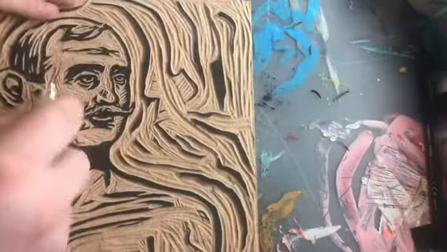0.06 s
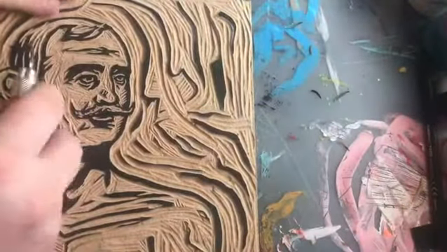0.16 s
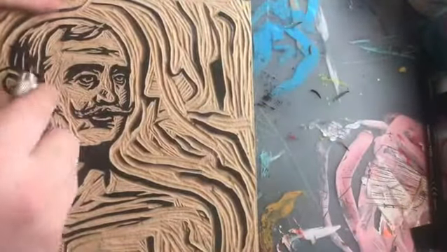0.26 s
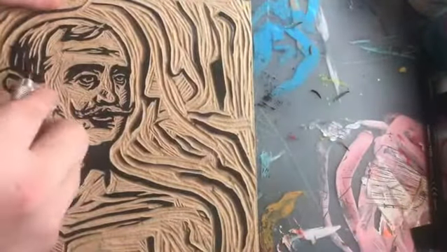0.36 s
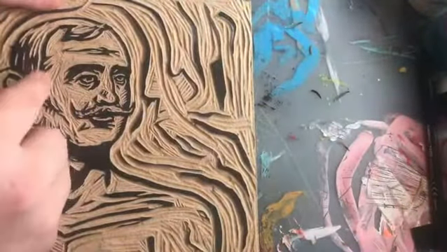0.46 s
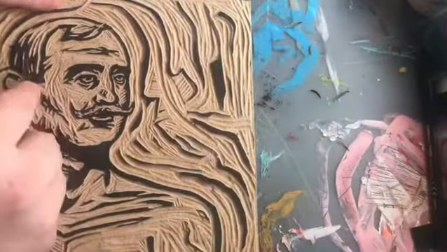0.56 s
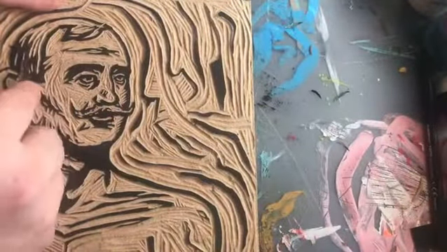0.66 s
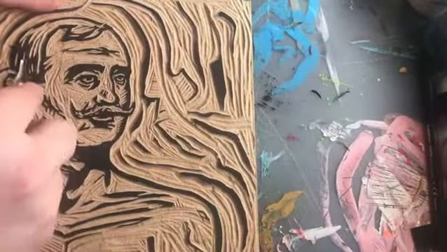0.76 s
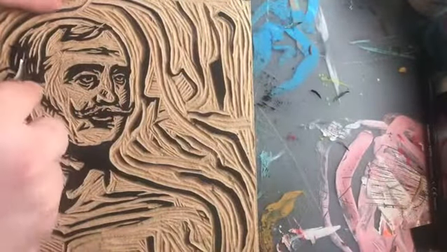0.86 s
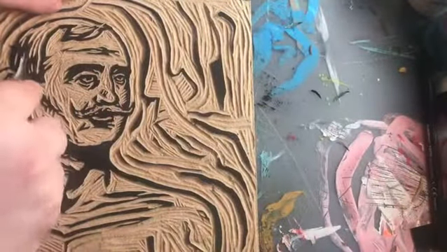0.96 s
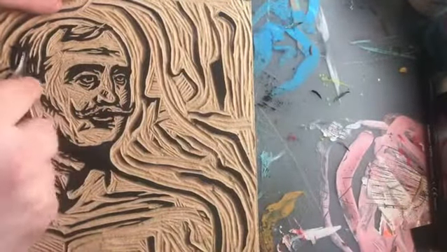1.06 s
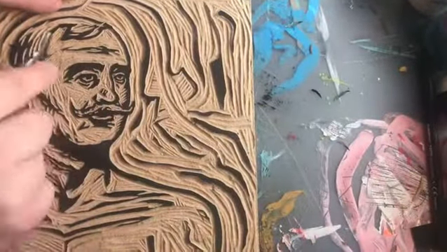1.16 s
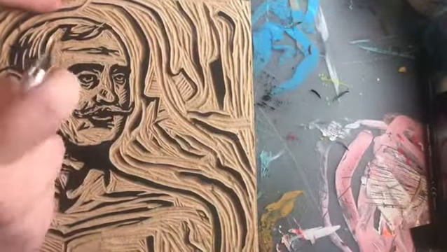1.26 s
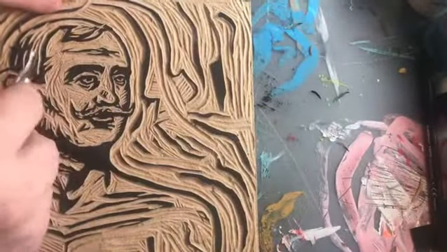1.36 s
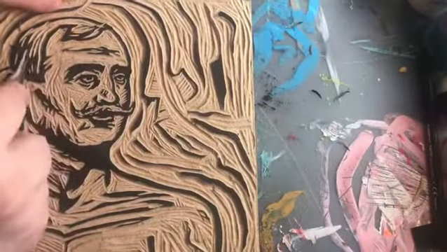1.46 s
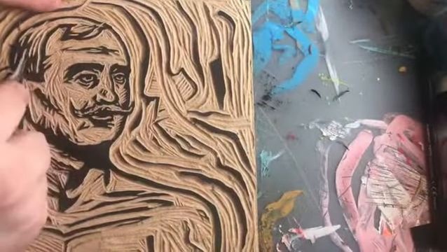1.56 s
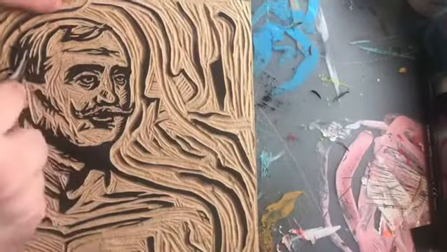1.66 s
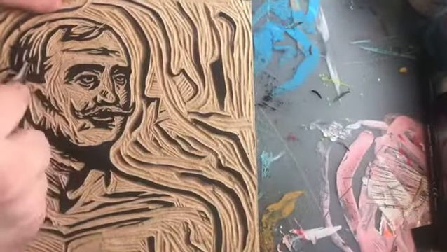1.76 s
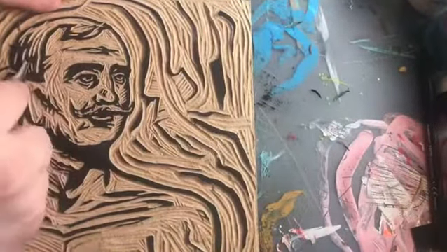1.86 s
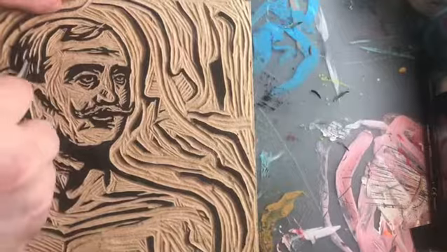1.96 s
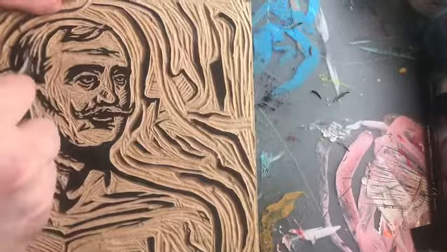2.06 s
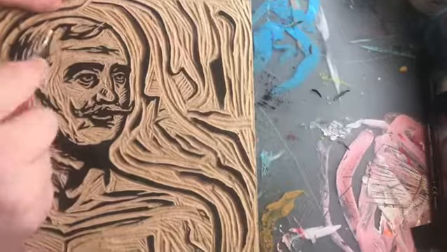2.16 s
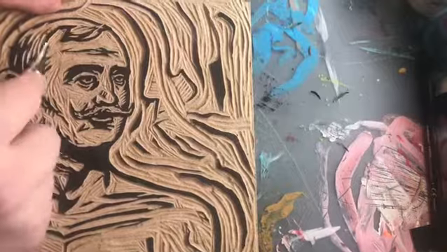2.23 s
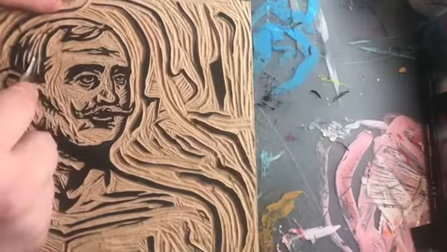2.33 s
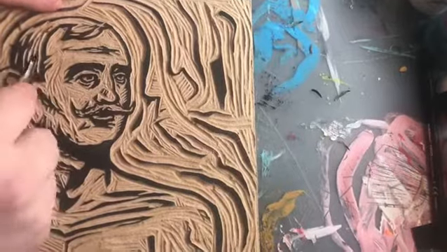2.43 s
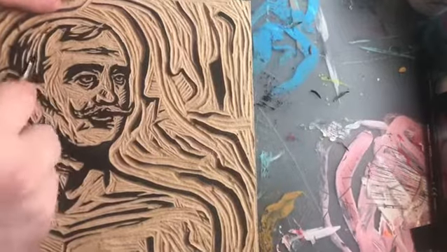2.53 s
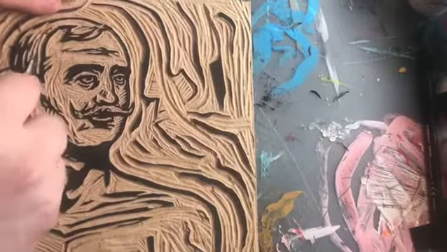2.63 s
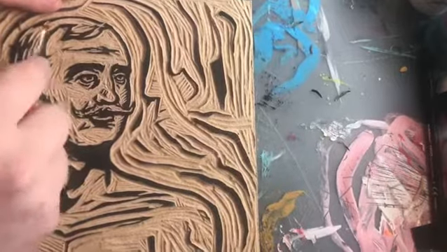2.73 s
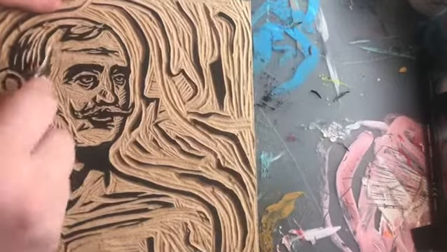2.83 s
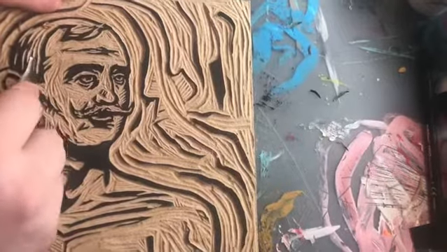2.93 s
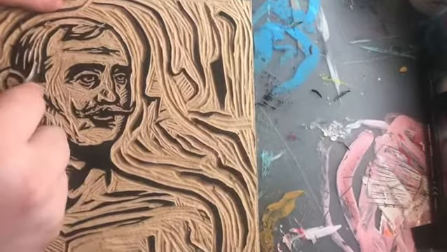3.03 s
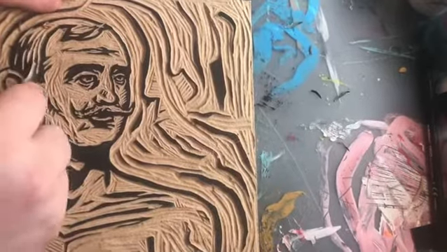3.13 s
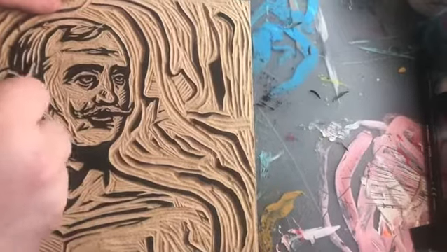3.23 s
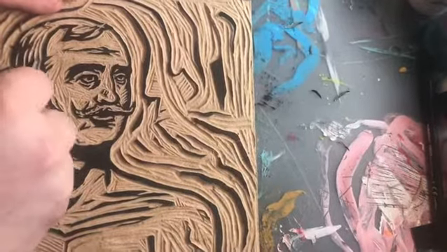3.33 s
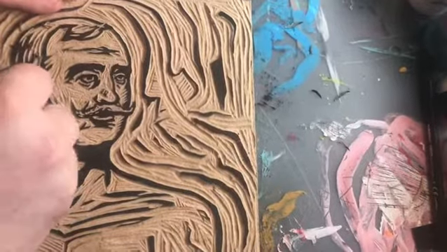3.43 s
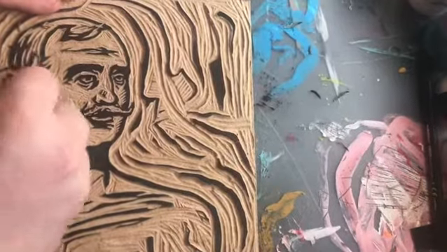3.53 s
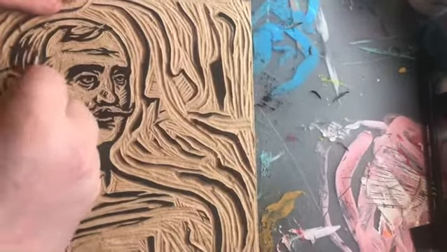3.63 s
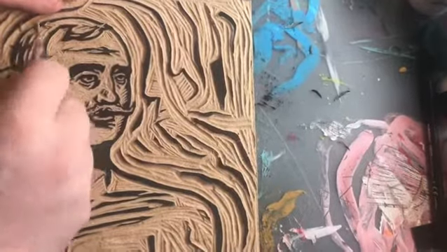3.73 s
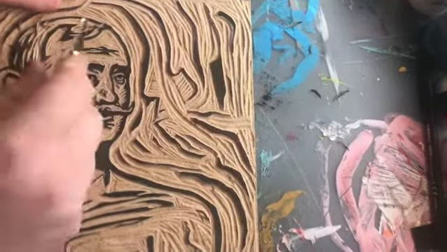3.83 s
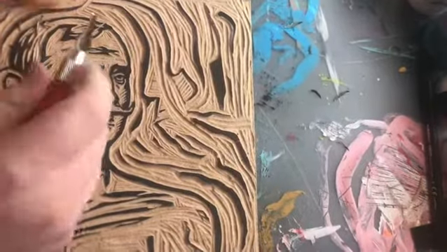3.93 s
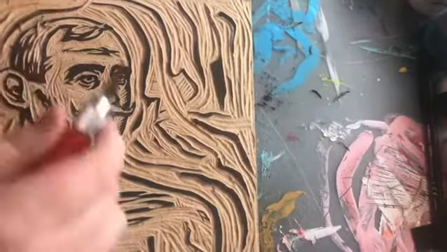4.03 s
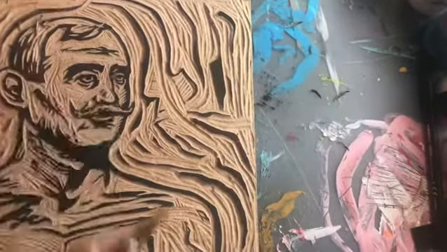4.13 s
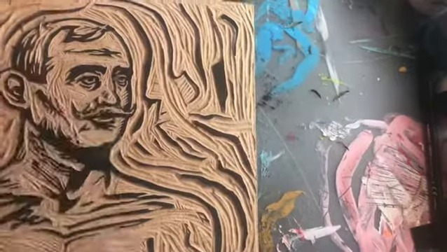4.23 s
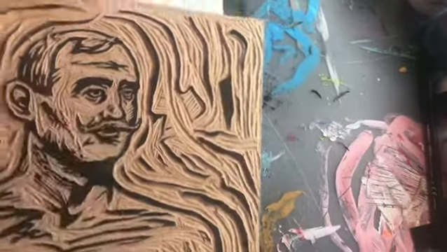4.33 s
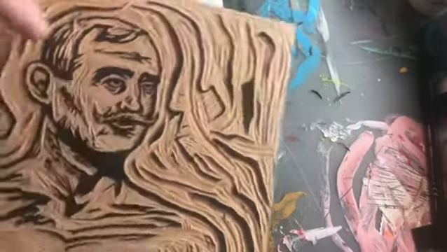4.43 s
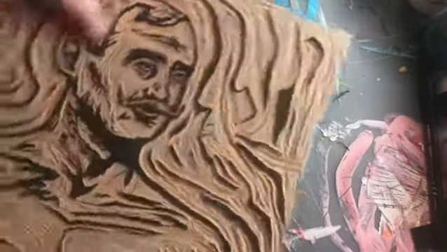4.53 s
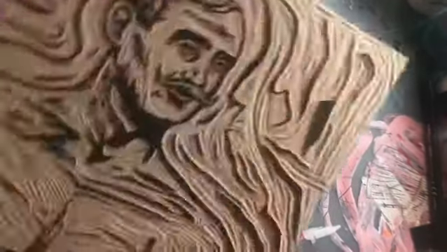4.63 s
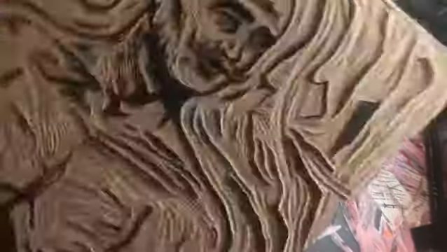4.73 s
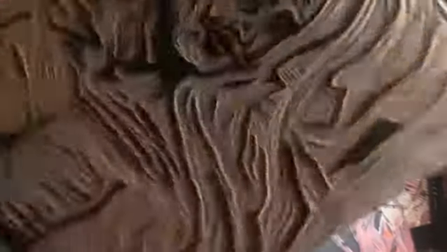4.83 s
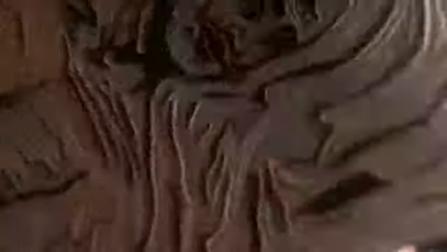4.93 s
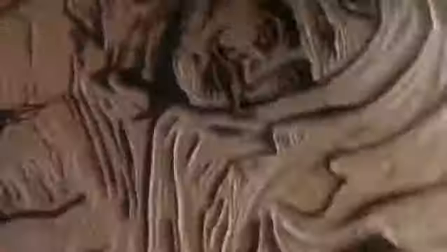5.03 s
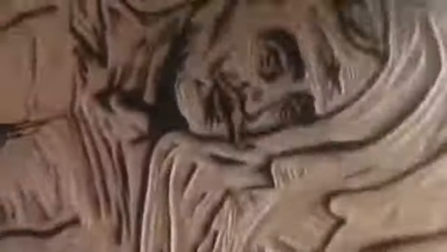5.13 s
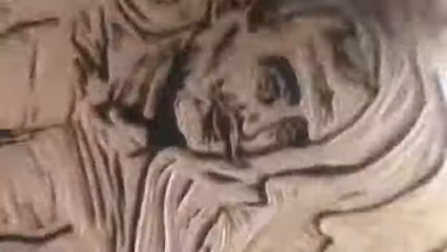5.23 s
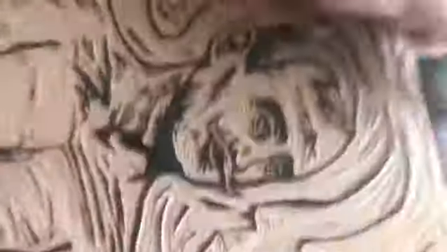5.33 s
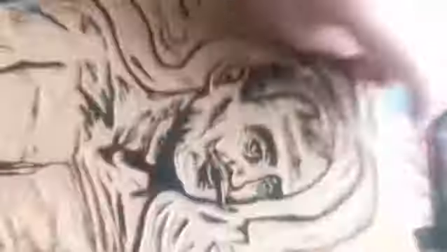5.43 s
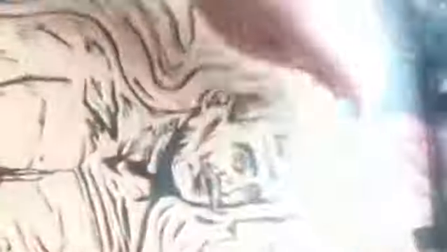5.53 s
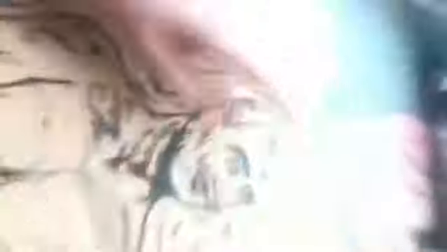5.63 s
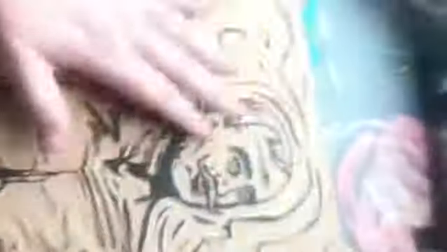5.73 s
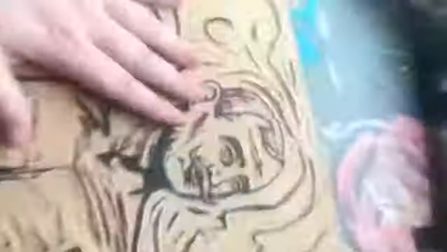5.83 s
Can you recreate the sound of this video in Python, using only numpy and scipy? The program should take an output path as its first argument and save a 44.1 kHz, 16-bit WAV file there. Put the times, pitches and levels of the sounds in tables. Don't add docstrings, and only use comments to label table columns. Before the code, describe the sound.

Light steel ticks and short gritty gouge scrapes on a wooden block, then the block drags, knocks and thuds onto a table.

```python
import sys
import numpy as np
from scipy import signal
from scipy.fft import rfft, irfft, next_fast_len
from scipy.io import wavfile
from scipy.ndimage import uniform_filter1d, map_coordinates

SR = 44100
rng = np.random.default_rng(int(sys.argv[2]) if len(sys.argv) > 2 else 0)


def to_wav(s):
    ch = np.atleast_2d(s).T
    pcm = np.round(np.clip(ch, -1, 1) * 32767)
    wavfile.write(sys.argv[1], SR, pcm.astype(np.int16))


def makeup_ratio(level_db):
    decades = np.asarray(level_db, float) / 20
    return 10 ** decades


N = 259308

# pitch_hz, density_db
RUMBLE = [(13, -68), (26, -25), (54, -1.5), (106, -11), (140, -14.5), (178, -5.5), (204, -9.5),
          (425, -22.5), (600, -21.5), (780, -91), (1320, -120)]
# pitch_hz, density_db
RUSTLE = [(240, -18), (400, 2.5), (504, -36.5), (655, -1), (1730, -4.5), (2250, -4.5), (3010, -8),
          (5930, -11), (7710, -10), (14700, -14), (15900, -12)]
# time_s, rustle_db
HAND = [(0.0, -65), (0.06, -65.5), (0.38, -75.5), (0.55, -71), (0.75, -70), (1.08, -65.5), (1.32, -74),
        (1.4, -76.5), (1.58, -75), (2.08, -74.5), (2.15, -72), (2.3, -76), (2.68, -72), (2.95, -76.5),
        (3.7, -67.5), (3.86, -58.5), (3.94, -67), (4.13, -79)]
# pitch_hz, t60_s
ROOM = [(100, 0.5), (1000, 0.31), (5000, 0.25), (14000, 0.19)]
# pitch_hz, width_hz, depth (0-1)
NOTCHES = [(8, 18, 0.4), (54.6, 12, 0.7), (7750, 570, 0.41), (10450, 880, 0.5)]
RUMBLE_DB, RUMBLE_FOLLOWS = -63, 0.45
STILL_DB, QUIET_AIR_DB = -72, -88

# centre_s, length_s, level_db,
# pitch_hz
SCUFFS = [(7.1, .006, -51, 3200), (5.57, 0.024, -58, 1700), (5.615, .012, -53, 2200),
          (0.49, 0.054, -68, 710), (0.46, 0.015, -70, 2200), (1.205, 0.015, -67, 3900),
          (1.285, 0.0067, -70, 5300), (1.609, 0.0082, -59.5, 2700), (3.051, 0.016, -69, 1300),
          (3.967, 0.058, -62, 5250),
          (.24, .004, -60, 2300), (.24, .004, -66, 4200), (.395, .005, -64, 3000),
           (2.321, .006, -59, 4400), (.359, .005, -64, 3500), (.564, .004, -59, 7500),
           (.445, .012, -61, 2700), (5.435, .003, -49, 2200)]
# centre_s, length_s, level_db, pitch_hz
CATCHES = [(1.012, .007, -61, 4300), (4.345, .015, -50, 2850), (4.39, .05, -48, 1400),
           (4.4, .025, -48, 3500), (4.41, .04, -50, 2700), (4.395, .03, -46, 3950), (4.44, .02, -43, 4150),
           (4.43, .012, -45, 2200), (4.51, .025, -47, 4250), (4.58, .02, -49, 5100),
           (4.555, .015, -43, 5900), (4.58, .018, -44, 6200), (4.62, .04, -48, 2370),
           (4.62, .03, -47, 1300), (4.6, .04, -48, 3100), (4.67, .012, -41, 5700), (4.67, .012, -42, 6300),
           (4.718, .018, -46, 6250), (4.735, .03, -48, 4250), (4.72, .018, -49, 3050),
           (4.76, .015, -49, 6400), (4.815, .015, -49, 4750), (4.79, 0.043, -56, 9000),
           (4.5, .03, -44, 600), (4.6, .04, -45, 700)]
# centre_s, length_s, level_db, pitch_hz
BITES = [(.85, .008, -52, 1850), (.87, .008, -53, 1500), (.97, .02, -44, 1810), (1.864, .006, -46, 1450),
         (1.91, .012, -49, 1550), (1.955, .01, -41, 1840), (1.972, .009, -41, 1600), (1.96, .02, -46, 6600),
         (2.51, .015, -50, 4900), (2.56, .025, -47, 1850), (2.565, .02, -50, 6500), (.965, .018, -43, 6870),
         (.97, .015, -46, 6300), (1.985, .018, -42, 390)]
SCUFF_WIDTH_HZ, CATCH_WIDTH_HZ = 1100, 150

# pitch_hz, width_hz, level_db
SKIMMED = [(1560, 110, -2), (2320, 59, 1), (4120, 60, -9), (735, 120, 1), (8300, 100, -17)]
GLIDE_S, GLIDE_LASTS_S, GLIDE_FADE_S, GLIDE_DB = .53, .25, .025, -63.5
WHISTLE_HZ, WHISTLE_FALLS_HZ_PER_S, WHISTLE_DB = 9950, 3300, -77

# start_s, length_s, rub_start_db, rub_end_db, hum_over_rub_db
SLIDES = [
    (4.083, 0.053, -72.5, -62, -15),
    (4.126, 0.094, -59, -51.5, -8.5),
    (4.241, 0.083, -51, -57.5, -15),
    (4.335, 0.2, -46, -40.5, -4),
    (4.402, 0.037, -40.5, -40, -6.5),
    (4.472, 0.106, -46.5, -37, -2),
    (4.576, 0.068, -39.5, -38, -5),
    (4.656, 0.019, -34, -33.5, -13),
]
# start_s, length_s, rub_start_db, rub_end_db, hum_over_rub_db
TIPPING = [
    (4.702, 0.12, -50, -47, -9),
    (4.835, 0.04, -57.5, -56.5, -8),
]
# start_s, length_s, rub_start_db, rub_end_db, hum_over_rub_db
PALMS = [(4.915, 0.013, -45.5, -52.5, -17), (4.95, 0.037, -55.5, -50, -4), (5.0, 0.054, -52.5, -61.5, -8),
         (5.08, 0.058, -66, -55, -7), (5.139, 0.048, -53, -46, 0), (5.197, 0.28, -49, -58.5, -0.5),
         (5.369, 0.019, -52, -42.5, -7), (5.42, 0.1, -67, -76.5, 26), (5.448, 0.0095, -41.5, -58, 10),
         (5.55, .07, -80, -76, -8), (5.635, 0.024, -58, -49, 11), (5.665, 0.092, -50, -49.5, -11),
         (5.756, 0.028, -49, -57, -16), (5.79, 0.021, -50.5, -48.5, 13), (5.82, 0.06, -49.5, -57.5, -6)]
# pitch_hz, density_db
RUB = [(410, -41), (700, -5), (1000, 2), (1340, 4.5), (1940, 4), (2150, 3.5), (6010, 0), (8000, -11),
       (10400, -75), (17600, -120)]
# pitch_hz, density_db
SKIN = [(530, -35), (900, -2.5), (1260, -6.5), (1490, -2), (1940, -9), (3890, -9), (8000, -19.5),
        (10400, -62), (17600, -120)]
# pitch_hz, density_db
HISS = [(3800, -18.5), (6500, -3.5), (7800, -4.5), (9300, -2.5), (10400, -4), (11400, -4.5), (12700, -5.5),
        (14500, -7), (16500, -7)]
# pitch_hz, width_hz, level_db
HUM = [(526, 71, 4), (611, 49, 8), (663, 76, 2.5), (1336, 52, -40)]
# pitch_hz, width_hz, level_db
TABLE = [(39.3, 6, -5), (64.3, 8.1, 2), (124.2, 33.2, 4), (197, 53, 1), (270, 72, -1), (384, 116, -8.5)]
FLAT, ON_EDGE, IN_HAND = (-5.5, -4.5), (1, 6.2), (0.58, -6)
GRIP_DB_PER_S, STOP_DB_PER_S = 1600, 795
FIRM_DB = -45
STREAK_SLANT = .12
BENDS_DB = -8.5
STEP = 32

# start_s, upper_db, then low_over_db, table_over_db, stiff_over_db
KNOCKS = [
    (5.435, -35, 9, 6, -4),
    (5.447, -19.5, 7.5, 7.5, -8.5),
    (5.463, -37, 8, 10, -15),
    (5.476, -42, 10, 2, -13),
    (5.494, -41, 1, -15, -3),
    (5.654, -39.5, 5, 6, -20),
]
# start_s, upper_db, then low_over_db, table_over_db, stiff_over_db
EDGE_KNOCKS = [
    (4.138, -57.5, 0, 11, -1),
    (4.163, -60, 7, 10.5, -8),
    (4.186, -61, 6, 12, -11),
    (4.215, -61, 8, 11, -9),
    (4.401, -39, -17, -1, -17),
    (4.82, -47.5, 12, 5, 4),
    (4.911, -37, 0.5, -17, -11),
    (4.981, -30.5, 8, -7, 2.5),
    (5.011, -43, 15, 9, -2),
    (5.032, -51, 19, 18, 10),
]
# start_s, upper_db, then low_over_db, table_over_db, stiff_over_db
GRIPPED = [
    (5.1865, -17, 2, -7, -17.5),
    (5.202, -39, -17, 5, -2),
]
# start_s, upper_db, then low_over_db, table_over_db, stiff_over_db
CORNERED = [
    (5.545, -17, -1, -17, -12.5),
    (5.5495, -24, 5.5, -29, -26),
    (5.603, -16.5, -4, -23, -16.5),
    (5.6075, -26, -1, -31, -15),
]
# start_s, upper_db, then low_over_db, table_over_db, stiff_over_db
PATTED = [
    (5.7455, -13, -2, -20, 0.5),
    (5.757, -34.5, 12.5, -6, 7),
    (5.8103, -20, -4, -18.5, -3.5),
    (5.8522, -32, 9, -39, -3),
]
# pitch_hz, width_hz, level_db
BOARD_LOW = [(273, 61, -8), (363, 170, -21.5)]
# pitch_hz, width_hz, level_db
BOARD = [(600, 180, 6), (670, 36, 13.5), (856, 46, 10)]
# pitch_hz, width_hz, level_db
STIFF = [(920, 45, -2), (1360, 27, 0), (1420, 340, -4.5), (2400, 230, -6)]
# pitch_hz, width_hz, level_db
TILTED_LOW = [(196.3, 10.5, 5), (277, 104, -5)]
# pitch_hz, width_hz, level_db
TILTED = [(630, 490, 4), (834, 61, 7)]
# pitch_hz, width_hz, level_db
TILTED_STIFF = [(1146, 95, 4), (2080, 140, -8), (2240, 100, -3)]
# pitch_hz, width_hz, level_db
GRIPPED_MODES = [
    [(310, 92, 0)],
    [(584, 160, 7), (800, 180, -9)],
    [(1050, 210, 6), (1550, 200, -14)],
]
CORNERED_MODES = [
    [(317, 230, 0)],
    [(630, 275, 4.5), (890, 360, -6)],
    [(990, 260, -1.5), (1480, 190, -2), (1990, 180, -5), (2560, 190, -8)],
]
PATTED_MODES = [
    [(298, 157, 0)],
    [(620, 180, -2), (817, 125, -6)],
    [(996, 174, 4.5), (1318, 100, -4.5), (1610, 360, -5), (2335, 260, -9.5)],
]
HARD_CONTACT_MS, SOFTENS_MS_PER_DB = .2, .0075
ROCK_S, ROCK_FULL_DB = 0.0051, 3.5
GLANCE_S = -.0002
# start_s, peak_db, pitch_hz, crack_over_peak_db
CLICKS = [(1.9895, -12.5, 5640, -5), (1.9886, -18, 3800, -3), (1.994, -21, 3900, -16),
          (4.135, -58, 4400, -8), (4.9122, -30, 5070, -10), (4.9804, -27, 5600, -5),
          (5.033, -38, 6140, -17), (5.4335, -44, 3300, -13), (5.4421, -33, 3030, 1.5),
          (5.446, -16.5, 2830, -26), (5.453, -34, 5500, -8), (5.4886, -26, 2650, -2),
          (5.5138, -37, 8500, -7), (5.5158, -44, 5500, 2), (5.5348, -50, 8300, -8), (5.5451, -25, 2770, -7),
          (5.6033, -32, 3000, -17), (5.645, -30, 2840, -24), (5.7459, -21, 4650, -10.5),
          (5.811, -29, 4500, -31), (5.8524, -36, 2400, -30)]

# start_s, peak_db, thump_over_peak_db
TAPS_LOW = [(0.05, -63.5, 18), (0.096, -56.5, 18), (.108, -62.5, 22), (0.1997, -21, -11.5), (.214, -63, 9),
            (0.236, -37.5, -4), (.262, -60, 12), (0.3466, -22.5, -13.5), (0.3916, -39.5, -8),
            (0.5623, -27, -12), (0.781, -62, -16), (0.8242, -35, -18), (0.846, -61, -24),
            (0.8694, -48, -18), (0.903, -47, -20), (1.813, -58, -12), (1.835, -38, -7), (2.4436, -39, -22),
            (3.151, -32.5, -8)]
# start_s, peak_db, thump_over_peak_db
TAPS_STEEP = [
    (1.3844, -34, -6.5),
    (1.6025, -40, -14),
    (2.3089, -24.5, -10),
    (2.9006, -31, -9),
    (3.4134, -30, -29),
]
# start_s, peak_db, thump_over_peak_db
TAPS_BURIED = [
    (0.9268, -33, -7),
    (0.9484, -18.5, -19.5),
    (1.8622, -33, -20),
]
# start_s, peak_db, thump_over_peak_db
TAPS_CHIPPING = [
    (1.9894, -27, 0.5),
    (1.9956, -22.5, -15),
]
BLADE_RINGS_DB = [-3, 7, -31, 10]
# delay_s, level_db
CHATTER = [
    (0, -1),
    (.0006, -6),
    (.0013, -4.5),
    (0.0118, -22),
]
# pitch_hz, width_hz, level_db
TIP = [(632, 43, 1.5), (980, 56, 1.5), (1440, 78, -16), (1824, 92, 6.5), (2570, 360, -7)]
# pitch_hz, width_hz, level_db
BLADE = [(2770, 350, -9), (3530, 330, 3.5), (4420, 360, -1), (5100, 340, 0), (6500, 630, -2),
         (8700, 1700, -8)]
# pitch_hz, width_hz, level_db
BLADE_STEEP = [(3400, 450, -2), (4080, 570, -1.5), (4650, 360, 0), (5300, 460, -1.5), (6300, 650, -9),
               (9200, 1700, -8.5)]
# pitch_hz, width_hz, level_db
THUMP = [(70, 36, -8.5), (123.6, 15, 3), (188, 27, 0), (290, 28, 2.5), (368, 31, -6), (413, 24, -6.5)]
# pitch_hz, width_hz, level_db
FERRULE = [(4270, 23, 0), (6450, 99, -9)]

# start_s, length_s, force_start_db, force_end_db, hiss_over_force_db
STROKES = [(.777, 0.035, -61.5, -61, -16), (.812, 0.0082, -51.5, -55, -3), (.824, 0.0059, -48, -52.5, 0),
           (.847, 0.014, -47.5, -59, -2), (.862, 0.023, -52.5, -55, -3), (.905, 0.0073, -48.5, -57, 1),
           (.919, 0.0097, -46.5, -46.5, -2), (.947, 0.027, -40, -39, -0.5), (.973, 0.013, -38, -41.5, 4),
           (.995, 0.065, -55, -68, -30), (1.813, 0.013, -57.5, -56.5, -3.5),
           (1.836, 0.018, -55.5, -49.5, -2), (1.861, 0.031, -43, -44.5, -3),
           (1.902, 0.022, -42.5, -48.5, 0), (1.927, 0.024, -42.5, -41.5, -3), (1.952, 0.022, -37, -35, -1),
           (1.976, 0.019, -49, -39.5, 5.5), (2.443, 0.0067, -49.5, -52, -6),
           (2.458, 0.072, -43.5, -41.5, -3.5), (2.52, 0.033, -42, -36.5, 1.5),
           (2.555, 0.028, -38.5, -40, 1.5), (3.134, 0.0053, -61, -66, -9), (3.149, 0.0069, -48, -51, -13),
           (3.165, 0.031, -46.5, -42.5, -21), (3.195, 0.041, -44.5, -52, -2),
           (3.236, 0.02, -46.5, -40, -2.5), (3.258, 0.042, -35.5, -43.5, -5.5),
           (3.298, 0.023, -45, -57, -0.5), (3.372, 0.014, -62.5, -67, 4.5), (3.402, 0.0075, -52, -51, -3),
           (3.415, 0.04, -41.5, -40.5, -0.5), (3.46, 0.08, -45, -61.5, 1.5),
           (3.535, 0.063, -47.5, -50, 1.5), (3.562, 0.031, -49.5, -41.5, 5), (3.59, 0.018, -48, -40.5, 5.5),
           (3.612, 0.029, -40, -64, 5.5)]
# centre_s, length_s, over_cut_db
SINGS = [
    (0.97, 0.031, 2.5),
    (1.95, 0.028, -4),
    (2.56, 0.028, -7),
    (3.27, 0.021, -15),
    (3.43, .03, -24),
    (3.608, .03, -28),
]
# pitch_hz, width_hz, level_db
BLOCK = [(644, 47, -8), (990, 140, -5), (1476, 79, -5), (1842, 102, -1), (2425, 98, -9), (3220, 240, -7),
         (3790, 530, -18.5), (4600, 180, -6.5), (6900, 82, -43), (8100, 5400, -23)]
# pitch_hz, width_hz, level_db
EDGE = [(4860, 330, -8), (6830, 210, 3), (8050, 450, -1.5), (9440, 230, -3), (15300, 220, -13)]
BITE_DB_PER_S, LIFT_DB_PER_S = 2602, 1700
CUT_SHAKE_DB, CUT_SHAKE_LAGS = 3, 0.18


def unit(x):
    return x / np.sqrt(np.mean(x ** 2) + 1e-20)


def along(points, hz):
    f, v = np.transpose(points)
    return np.interp(np.log(hz + 1), np.log(f + 1), v)


def wobble(rate):
    knots = rng.standard_normal(int(N * rate / SR) + 4)
    return map_coordinates(knots, [np.arange(N) * rate / SR])


def swell(s, length):
    return np.exp(-((np.arange(N) / SR - s) / length) ** 2)


def resonance(f, centre, width):
    return 1j * f * width / (centre * centre - f * f + 1j * f * width)


def filtered(x, response):
    m = next_fast_len(N + SR // 2)
    return irfft(rfft(x, m) * response(np.fft.rfftfreq(m, 1 / SR)), m)[:N]


def ring(x, modes, order=1):
    def gain(f):
        return sum((-1) ** k * makeup_ratio(db) * resonance(f, centre, width) ** order
                   for k, (centre, width, db) in enumerate(modes))
    return filtered(x, gain) / np.sqrt(np.mean(np.abs(gain(np.arange(SR // 2))) ** 2))


def tint(x, spectrum):
    def gain(f):
        return makeup_ratio(along(spectrum, f))
    return filtered(x, gain) / np.sqrt(np.mean(gain(np.arange(SR // 2)) ** 2))


def grit(slow_db, fast_db, fast_rate, patchy_db, slant=0):
    z = signal.stft(rng.standard_normal(N), nperseg=512)[2]
    field = uniform_filter1d(rng.standard_normal(z.shape), size=2, axis=0)
    field = uniform_filter1d(field, size=18, axis=1)
    bins, frames = np.indices(z.shape)
    field = field[(bins - (slant * frames).astype(int)) % len(z), frames]
    noise = signal.istft(z * makeup_ratio(patchy_db * unit(field)), nperseg=512)[1][:N]
    return unit(makeup_ratio(slow_db * wobble(45) + fast_db * wobble(fast_rate)) * noise)


def pushes(times, levels_db, contact_ms):
    out, t = np.zeros(N + 2048), np.arange(1, 2049) / SR
    for s, db, ms in zip(times, levels_db, np.broadcast_to(contact_ms, len(times))):
        u = t * 1000 / np.clip(ms, .02, 4)
        shape = u * u * np.exp(-2 * u)
        out[round(s * SR):][:len(t)] += makeup_ratio(db) * shape / shape.sum()
    return out[:N]


def snaps(rate, size_db, die_s):
    breaks = (rng.random(N) < rate / SR) * makeup_ratio(size_db + 2.5 * rng.standard_normal(N))
    return 1 + signal.lfilter([1], [1, -np.exp(-1 / (die_s * SR))], breaks)


def efforts(rows, rise_db_per_s, fall_db_per_s):
    t = np.arange(0, N, STEP) / SR
    levels = []
    for s, length, a, b, *_ in rows:
        end = s + length
        corners = [s - (a + 120) / rise_db_per_s, s, end, end + (b + 120) / fall_db_per_s]
        levels.append(np.interp(t, corners, [-120, a, b, -120]))
    strongest = np.argmax(levels, axis=0)
    more = uniform_filter1d(np.transpose(rows)[4:, strongest], size=12, axis=1)
    return [np.interp(np.arange(N) / SR, t, v) for v in [np.max(levels, axis=0), *more]]


def scuffs(rows, width_hz, noise):
    out = np.zeros(N)
    for s, length, db, hz in rows:
        near = slice(max(round((s - 3 * length) * SR), 0), round((s + 3 * length + .03) * SR))
        touch = makeup_ratio(db) * swell(s, length)[near] * noise[near]
        out[near] += signal.lfilter(*signal.iirpeak(hz, hz / width_hz, SR), touch)
    return out * np.sqrt(SR / np.pi / width_hz)


def room(x):
    hz, t, z = signal.stft(rng.standard_normal(SR // 2), SR, nperseg=256)
    tail = signal.istft(z * makeup_ratio(-60 * t / along(ROOM, hz)[:, None]), SR, nperseg=256)[1]
    return signal.fftconvolve(np.pad(x, (160, 0)), tail / np.linalg.norm(tail))[:N]


def hand():
    rustle_db = np.interp(np.arange(N) / SR, *np.transpose(HAND))
    rumble_db = RUMBLE_DB + RUMBLE_FOLLOWS * (rustle_db - STILL_DB) + 3.6 * wobble(6.9)
    skin = grit(slow_db=1.2, fast_db=0, fast_rate=120, patchy_db=1.5)
    air = makeup_ratio(QUIET_AIR_DB) * rng.standard_normal(N)
    rustle = tint(makeup_ratio(rustle_db + 3.5) * skin + air, RUSTLE)
    touches = scuffs(SCUFFS, SCUFF_WIDTH_HZ, skin) + scuffs(CATCHES + BITES, CATCH_WIDTH_HZ, skin)
    return rustle + touches + tint(makeup_ratio(rumble_db) * rng.standard_normal(N), RUMBLE)


def glide():
    t = np.arange(N) / SR
    corners = GLIDE_S + np.array([0, 3 * GLIDE_FADE_S, GLIDE_LASTS_S, GLIDE_LASTS_S + GLIDE_FADE_S])
    touch = np.interp(t, corners, [0, 1, 1, 0])
    hz = WHISTLE_HZ - WHISTLE_FALLS_HZ_PER_S * (t - GLIDE_S)
    whistle = makeup_ratio(WHISTLE_DB) * wobble(150) * np.sin(2 * np.pi * np.cumsum(hz) / SR)
    skim = makeup_ratio(GLIDE_DB + 1.8 * wobble(39.3)) * touch * rng.standard_normal(N)
    return ring(skim, SKIMMED) + touch ** 3 * whistle


def drag(rows, spectrum, shake_lags, hiss_lags):
    db, hum_db, table_db, hiss_db = efforts(rows, GRIP_DB_PER_S, STOP_DB_PER_S)
    table_db = table_db - shake_lags * (db - FIRM_DB)
    hiss_db = hiss_db - hiss_lags * (db - FIRM_DB)
    rub = makeup_ratio(db) * grit(slow_db=.7, fast_db=1, fast_rate=300, patchy_db=2.2, slant=STREAK_SLANT)
    shake = ring(makeup_ratio(table_db) * rub, TABLE + BOARD_LOW)
    bend = ring(makeup_ratio(hum_db + BENDS_DB) * rub, BOARD_LOW)
    hum = ring(makeup_ratio(hum_db + 1.0) * rub, HUM)
    return tint(rub, spectrum) + hum + shake + bend + tint(makeup_ratio(hiss_db) * rub, HISS)


def knocks(rows, low_modes, upper_modes, stiff_modes, order=1):
    s, db, low_db, table_db, stiff_db = np.transpose(rows)
    ms = HARD_CONTACT_MS - SOFTENS_MS_PER_DB * stiff_db
    s = s + 0.00107
    loaded = s + GLANCE_S * (order - 1)
    rocked = loaded + ROCK_S * np.clip(-low_db / ROCK_FULL_DB, 0, 1)
    low = ring(pushes(rocked, db + low_db + 21.5, contact_ms=0.33), low_modes, 2 * order - 1)
    upper = ring(pushes(loaded, db + 22.0, ms), upper_modes, 2 * order - 1)
    stiff = ring(pushes(loaded, db + stiff_db + 21.0, ms / 2), stiff_modes, order)
    table = ring(pushes(s, db + table_db + 35.0, contact_ms=1.68), TABLE)
    return (-1) ** (order - 1) * (low + upper + stiff) - table


def clicks():
    out, t = np.zeros(N + 512), np.arange(512) / SR
    crack = signal.lfilter([1, 0, -1], [1], rng.standard_normal((len(CLICKS), 512))) * makeup_ratio(-60 * t / 0.006)
    for (s, db, hz, top_db), noise in zip(CLICKS, crack):
        tone = np.sin(2 * np.pi * hz * t) * makeup_ratio(-60 * t / 0.0039) * np.minimum(t / 0.0001, 1)
        out[round((s + .0007) * SR):][:512] += makeup_ratio(db) * (tone + makeup_ratio(top_db - 6.5) * noise)
    return out[:N]


def taps():
    out = ring(pushes([.018, 5.505, 5.517], [-33, -24, -26], contact_ms=[0.012, .09, .09]), FERRULE)
    holds = [TAPS_LOW, TAPS_STEEP, TAPS_BURIED, TAPS_CHIPPING]
    blades = [BLADE, BLADE_STEEP, BLADE, BLADE]
    for rows, blade_modes, blade_db in zip(holds, blades, BLADE_RINGS_DB):
        s, db, thump_db = np.transpose(rows)
        wood, steel = np.zeros((2, N))
        for later, skip_db in CHATTER:
            when = s + later * rng.uniform(.85, 1.3, len(s))
            size_db = db + rng.normal(skip_db, 0.54, len(s))
            wood += pushes(when, size_db + 2.5, contact_ms=0.053)
            steel += pushes(when, size_db + blade_db + 6.5, contact_ms=0.064)
        thump = ring(pushes(s - .001, db + thump_db + 22.5, contact_ms=0.2), THUMP)
        out = out + ring(wood, TIP) + ring(steel, blade_modes) + thump
    return out


def gouge():
    db, hiss_db = efforts(STROKES, BITE_DB_PER_S, LIFT_DB_PER_S)
    table_db = CUT_SHAKE_DB - CUT_SHAKE_LAGS * (db - FIRM_DB)
    force = makeup_ratio(db) * unit(snaps(rate=220, size_db=-8, die_s=.002))
    tear = force * grit(slow_db=1.5, fast_db=0.8, fast_rate=280, patchy_db=1.5)
    broad = makeup_ratio(-6.5) * tint(tear, RUB)
    singing = sum(makeup_ratio(over_db) * swell(s, length) for s, length, over_db in SINGS)
    sing = ring(singing * tear, EDGE)
    shake = ring(makeup_ratio(table_db - 0.5) * force * rng.standard_normal(N), TABLE)
    hiss = tint(makeup_ratio(hiss_db - 3.5) * tear, HISS)
    return ring(tear, BLOCK) + broad + shake + sing + hiss


def scene():
    cut, tap = gouge(), taps() + clicks()
    on_table = [(*row, *FLAT) for row in SLIDES] + [(*row, *ON_EDGE) for row in TIPPING]
    in_hand = [(*row, *IN_HAND) for row in PALMS]
    slide = drag(on_table, RUB, shake_lags=0.38, hiss_lags=0.033)
    slide = slide + drag(in_hand, SKIN, shake_lags=0.53, hiss_lags=0.45)
    hit = knocks(KNOCKS, BOARD_LOW, BOARD, STIFF)
    hit = hit + knocks(EDGE_KNOCKS, TILTED_LOW, TILTED, TILTED_STIFF)
    for rows, modes in [(GRIPPED, GRIPPED_MODES), (CORNERED, CORNERED_MODES), (PATTED, PATTED_MODES)]:
        hit = hit + knocks(rows, *modes, order=2)
    wet = makeup_ratio(-13) * room(cut + slide) + makeup_ratio(-12.0) * room(tap) + makeup_ratio(-11.5) * room(hit)
    return (cut + tap + slide + hit + wet + hand() + glide())[None]


def band_limit(x):
    return signal.sosfilt(signal.butter(12, 16670, fs=SR, output="sos"), x)


def record(dry):
    def response(f):
        dips = np.prod([1 - min(depth, 1) * resonance(f, hz, width) for hz, width, depth in NOTCHES], axis=0)
        return dips * np.where(f < 15850, 1, makeup_ratio(-28)) * (f < 16550)
    x = filtered(dry[0], response)
    x = x / (1 + np.abs(x / .5) ** 4) ** (1 / 4)
    return band_limit(x[None])


dry = scene()
out = record(dry)
to_wav(out)
```